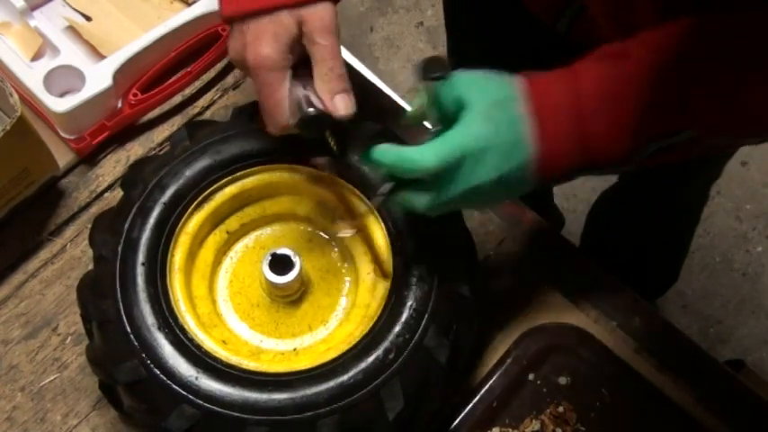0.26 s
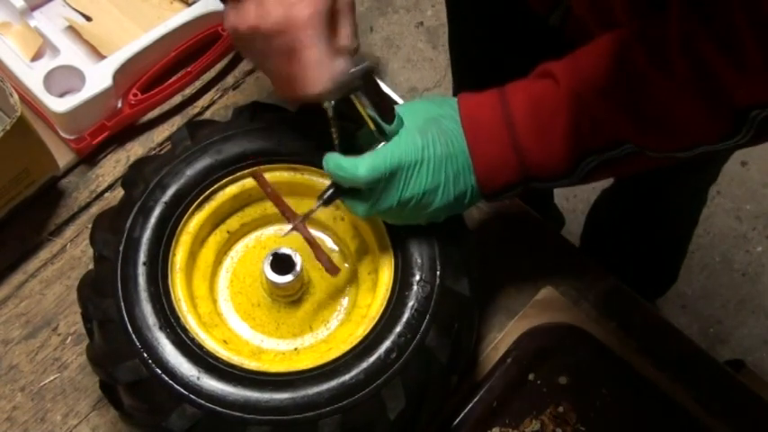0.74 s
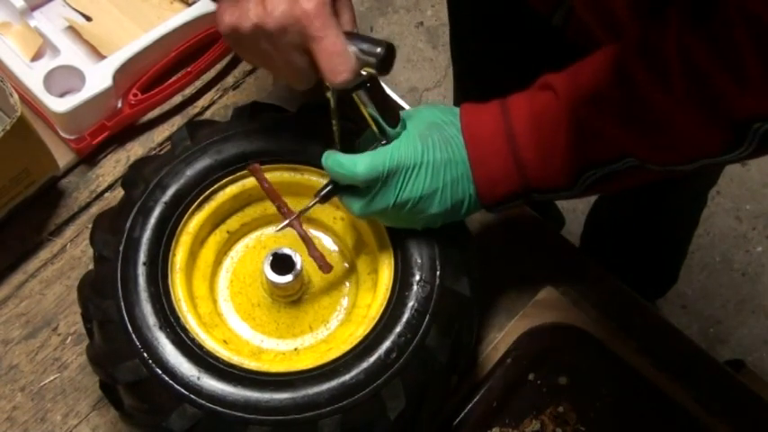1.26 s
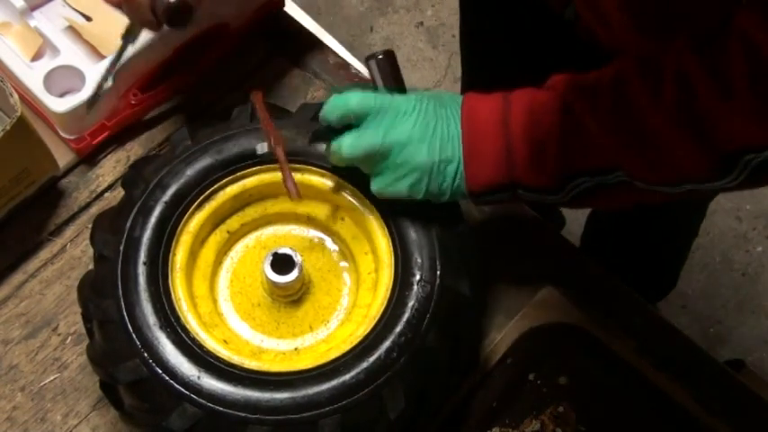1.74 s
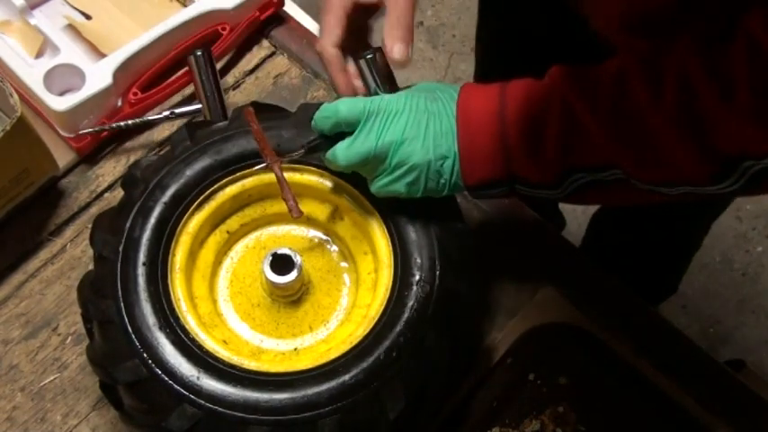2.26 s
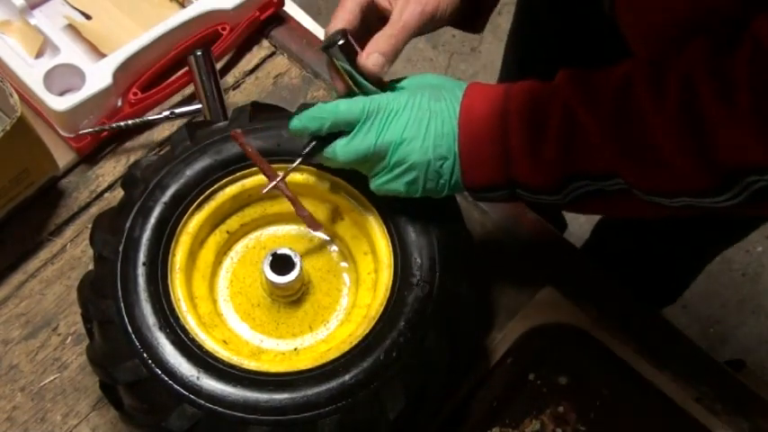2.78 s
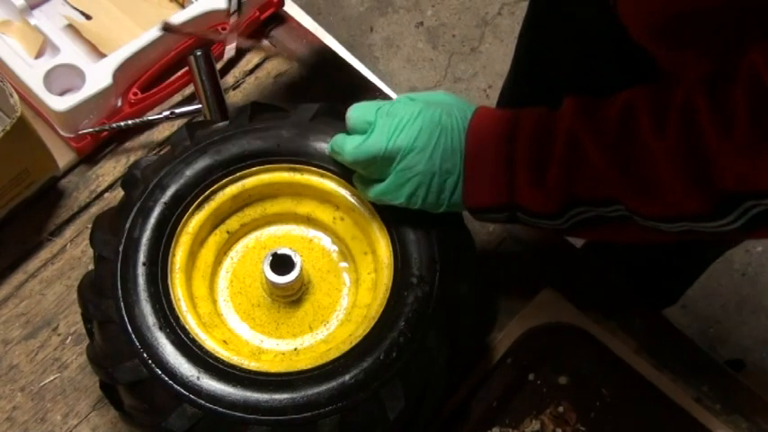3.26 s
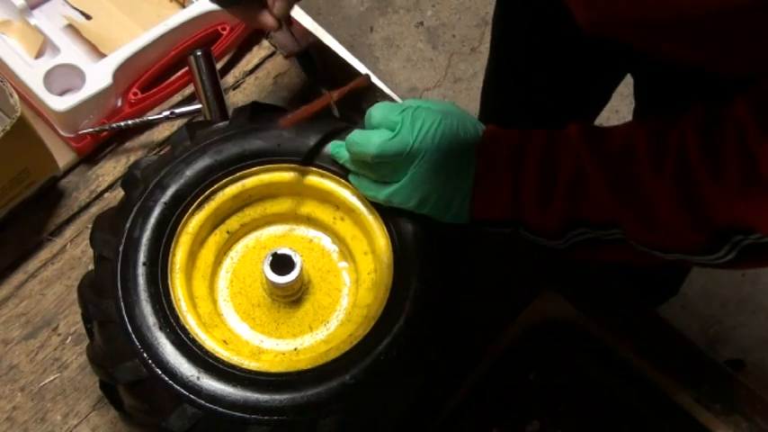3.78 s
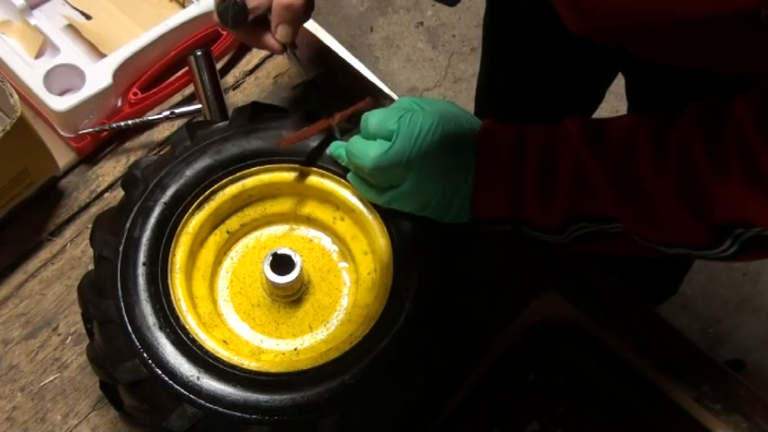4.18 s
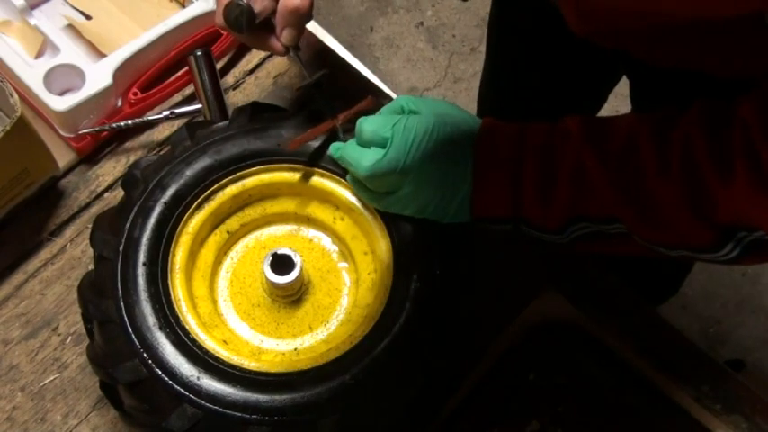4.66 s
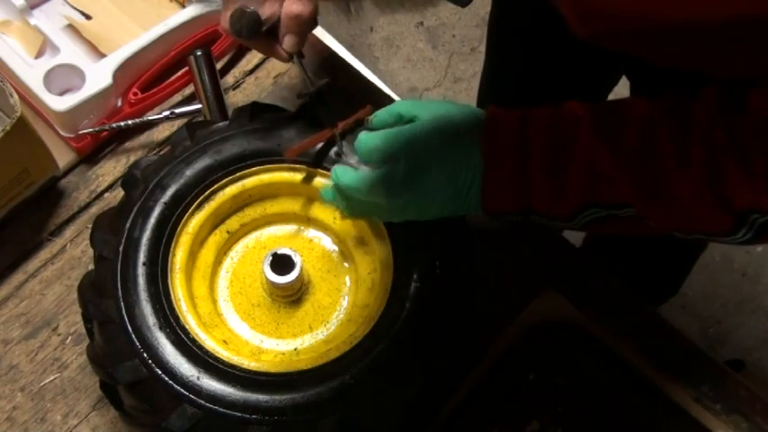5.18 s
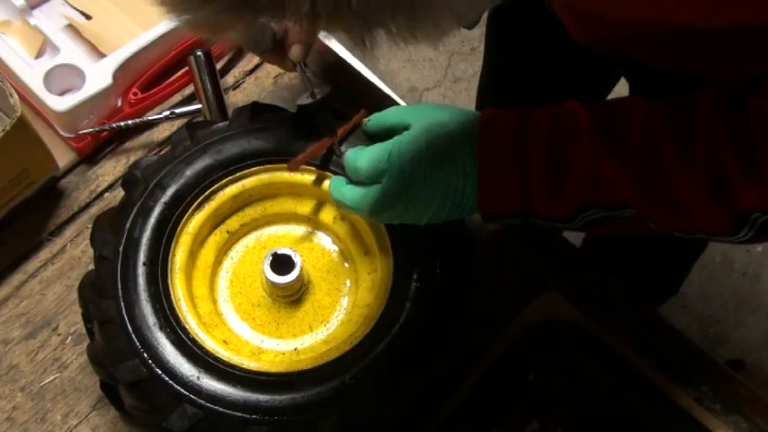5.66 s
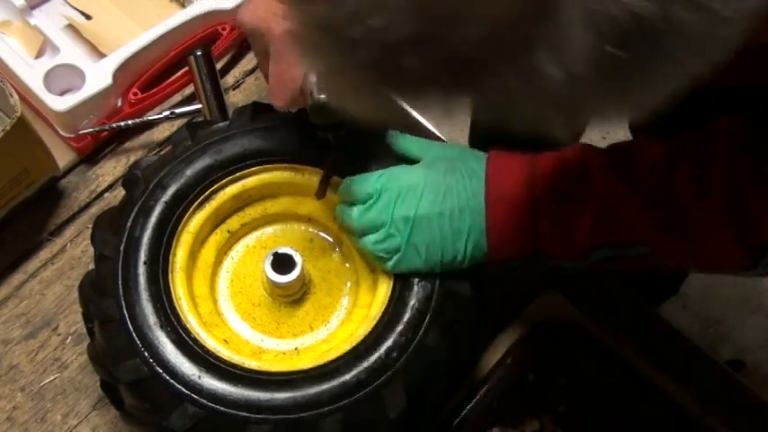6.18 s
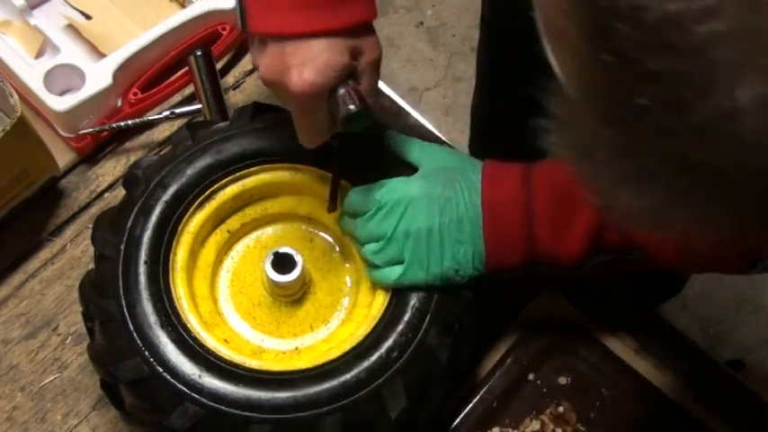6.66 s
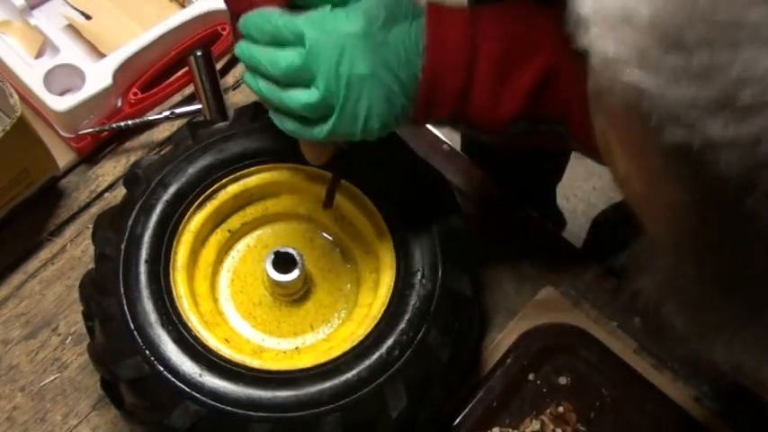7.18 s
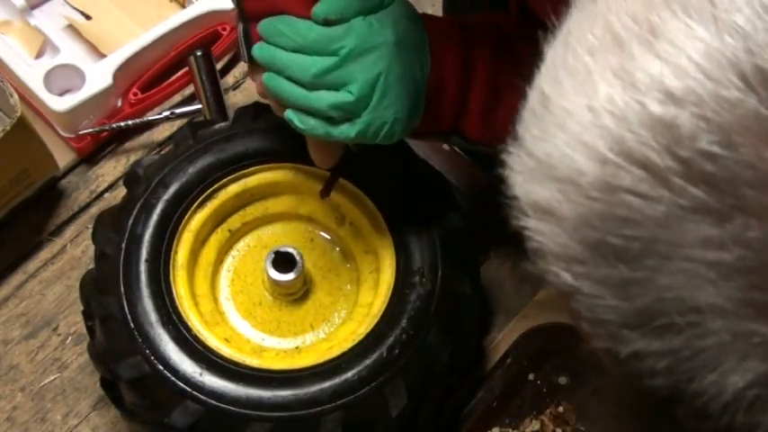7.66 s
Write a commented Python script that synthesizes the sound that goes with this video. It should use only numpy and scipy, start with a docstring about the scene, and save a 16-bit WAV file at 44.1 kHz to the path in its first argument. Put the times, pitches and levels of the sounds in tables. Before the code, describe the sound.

A quiet garage, heard from close beside a small punctured tyre. At about 0.3 seconds, tools knock dully on a bench to the left and rattle briefly. From 1.3 to 2 seconds, air hisses from the hole in uneven spurts. Just after 2 seconds a tool clatters into a plastic tray on the left, with sharp clicks. Faint puffs follow, then a stronger one with a tiny rubber squeak at 3 seconds. Small puffs, thin high whistles and ticks continue, with a sharp spit of air at 4.6 seconds. At 5.1 seconds, clicks open the longest leak, a bright, sputtering hiss that shifts in tone, with a faint rubber squeal near 5.6 seconds. It cuts off at 6.7 seconds. Light clicks, faint rings from the steel rim and soft sleeve rustle fade into the room's low hush by 7.6 seconds.

```python
"""Air escaping from a puncture in a small tubeless tyre, on a garage bench, close to a near-mono microphone.
A reamer, a finger and a plug tool open and close the hole: the turbulent jet hisses in puffs and longer
leaks, whistles through narrow gaps and flaps the rubber into a squeal. Tools click, chatter, ring the steel
rim and knock on the bench and a plastic tray to the left. Behind them, sleeves rustle in a quiet room."""
import sys
import numpy as np
from scipy import signal
from scipy.fft import rfft, irfft, next_fast_len
from scipy.io import wavfile
from scipy.ndimage import uniform_filter1d, map_coordinates

SR = 44100
rng = np.random.default_rng(int(sys.argv[2]) if len(sys.argv) > 2 else 0)


def to_wav(s):
    """Save 16-bit WAV."""
    ch = np.atleast_2d(s).T  # columns
    pcm = np.round(np.clip(ch, -1, 1) * 32767)  # PCM
    wavfile.write(sys.argv[1], SR, pcm.astype(np.int16))


N = 349272

# The jet's colour before its bands are balanced. Each row: frequency in Hz, relative level in dB.
JET_SPECTRUM = [(200, -37), (500, -19.5), (1000, -15.5), (2650, -12), (3900, -13.5), (5200, -6), (8400, 2),
                (12000, -6.5), (13500, -7.5), (15900, -17)]
# Noise close to the microphone. Each row: frequency in Hz, left-right likeness (1 is mono).
CLOSE_LIKENESS = [(9000, 0.94), (15000, 1)]
# Leaks and a puff whose loudness and colour change as they hiss; one list each. Each row: time in
# seconds, hiss in dB, then low rasp, hole resonance and treble in dB over the hiss.
SHAPED_LEAKS = [
    [(1.3, -37.5, -5, -19, -1), (1.32, -23.5, -10, -26, 5), (1.44, -24, -22, -36, 7),
     (1.51, -19, -13, -31, -4), (1.6, -23, -15.5, -32, 5), (1.68, -19, -15.5, -19.5, -9.5),
     (1.7, -42.5, -25, -5, -13.5), (1.79, -54, -23, -24, -5.5)],
    [(2.94, -49.5, 8, -24, 6.5), (2.957, -29, -10.5, -27, 5), (3.035, -18, -15, -15, -7),
     (3.075, -47.5, -12, -16, -10)],
    [(5.142, -33, -8, -11, -2.5), (5.158, -18.5, -9.5, -16, -11), (5.19, -22, -16, -28, -0.5),
     (5.25, -24.5, -19.5, -36, 7), (5.5, -25.5, -14, -18.5, 6.5), (5.74, -17.5, -20, -30, -6),
     (5.9, -19.5, -25.5, -33.5, -4), (6.1, -22, -24, -24, 2), (6.18, -30, -20.5, -21.5, 3),
     (6.31, -28, -21, -17, 1.5), (6.33, -25.5, -19.5, -7.5, -2), (6.42, -26.5, -18.5, -13, 3),
     (6.46, -32, -18, -15, 10), (6.55, -30.5, -18.5, -15.5, 4.5), (6.59, -25, -16.5, -10, 1.5),
     (6.665, -34, -17, -20, 2.5), (6.7, -78.5, -24, -13, -7.5)],
]
# Short leaks. Each row: fully open and starting to shut in seconds, hiss in dB, rise and fall
# in dB per second, then low rasp, hole resonance and treble in dB over the hiss.
SHORT_LEAKS = [(1.276, 1.316, -38.5, 2306, 799.5, -15, -17.5, 0.5),
               (1.82, 1.868, -22.5, 1909, 412.5, -10, -35, 2.5),
               (1.948, 1.983, -23.5, 242, 912.5, -10.5, -18, -1),
               (2.21, 2.225, -40, 120.5, 65.5, -14.5, -29, 0.5),
               (2.72, 2.788, -38, 147.5, 74, -15, -18, 1.5),
               (3.509, 3.559, -48.5, 281.5, 319, -17, -23, -1),
               (3.762, 3.836, -38, 1200, 707, -9, -22, 2.5), (4.62, 4.624, -20.5, 6000, 2500, -23, -28, -9),
               (4.63, 4.978, -46, 1002, 64, -30.5, -21.5, -6),
               (5.1, 5.153, -35.5, 401, 800, -14.5, -25, -3)]
def jet(band_edges_hz=(3500, 11500), hole_hz=3100, hole_width_hz=700):
    """Turbulent air; how the hole is covered shifts weight between three bands and its ringing hollow."""
    hiss, rasp, hole, treble = curves(SHAPED_LEAKS)
    powers = amp([hiss + rasp, hiss, hiss + treble, hiss + hole]) ** 2
    for *shape, rasp, hole, treble in SHORT_LEAKS:
        powers += (swell(*shape) * amp([[rasp], [0], [treble], [hole]])) ** 2

    def split(hz):
        below = np.array([1 / (1 + (hz / edge) ** 8) for edge in band_edges_hz])[:, None]
        bands = np.diff(below, axis=0, prepend=0, append=1)
        hollow = resonance(hz, hole_hz, hole_width_hz) ** 2 / amp(along(JET_SPECTRUM, hz))
        comb = 1 + .14 * np.exp(-2j * np.pi * hz / 1680)  # a second path off the wheel, 20 cm longer
        return np.concatenate([bands, hollow[None, None]]) * comb

    parts = filtered(rush(JET_SPECTRUM, CLOSE_LIKENESS, patchy_db=2.0), split)
    flutter = 0.22 * wobble(45)  # the flow sputters, most in the rasp and the hollow
    sputter_db = [flutter + 1.3 * wobble(30), flutter, flutter, flutter + 1.5 * wobble(25)]
    return sum(np.sqrt(power) * amp(db) * unit(part) for power, db, part in zip(powers, sputter_db, parts))


# At the hole. Each row: start and length in seconds, first and last pitch in Hz, level in dB.
GAP_WHISTLES = [(1.674, 0.0061, 2710, 3380, -14.5), (2.68, 0.025, 4750, 6160, -37.5),
                (3.5, 0.034, 15600, 15300, -35.5), (3.532, 0.038, 15900, 13300, -35),
                (3.76, 0.024, 15770, 12720, -20.5), (4.617, 0.025, 13900, 16070, -26),
                (4.7, 0.012, 15870, 14360, -24)]
def whistles():
    """Air through a narrow gap sings a breathy tone that glides as the gap changes."""
    out = np.zeros(N)
    for start, length, first_hz, last_hz, db in GAP_WHISTLES:
        n = round(length * SR)
        hz = np.linspace(first_hz, last_hz, n) * (1 + 0.022 * smooth_noise(SR // 10, 40)[:n])
        breath = 1 + .55 * unit(smooth_noise(SR // 10, 60))[:n]
        tone = np.sin(2 * np.pi * np.cumsum(hz) / SR)
        add(out, start, amp(db) * breath * np.sqrt(2 * np.hanning(n)) * tone)
    return out


# One list a squeal. Each row: time in seconds, pitch in Hz, relative level in dB.
RUBBER_SQUEALS = [
    [(3.004, 1326, -41), (3.013, 1036, -32.5), (3.023, 1085, -39.5), (3.035, 1532, -31), (3.044, 2210, -30)],
    [(5.55, 1025, -61), (5.575, 893, -34.5), (5.605, 887, -64)],
    [(5.61, 540, -47.5), (5.67, 606, -40), (5.73, 564, -49.5), (5.77, 530, -55.5), (5.86, 519, -53),
     (5.9, 685, -46), (5.925, 815, -49)],
]
def squeal(harmonics_db=(1, 4, -6), full_db=-40, ring_hz=3240):
    """Rubber lips flap in the flow: a shaky harmonic tone, purer when faint."""
    hz, db = curves(RUBBER_SQUEALS)
    phase = 2 * np.pi * np.cumsum(hz * (1 + 0.009 * wobble(250))) / SR
    thin_db = .35 * np.minimum(db - full_db, 0)
    shake_db = np.where(thin_db < 0, 1.5, 4.5)
    tone = sum(amp(db + level + k * thin_db + shake_db * wobble(150)) * np.sin((k + 1) * phase)
               for k, level in enumerate(harmonics_db))
    rubber = lambda ratio: 1 / (1 - ratio ** 2 + .2j * ratio) / (1 + ratio ** 8)
    return filtered(tone, lambda f: rubber(f / ring_hz))  # the rubber rings and passes little above


# Sharp clicks of tools and rubber, and pops of air as the hole opens, close to the microphone.
# Each row: start in seconds, relative level in dB, centre in Hz.
SHARP_CLICKS = [(0.1005, -28.5, 8990), (0.263, -7, 11530), (0.4045, -16.5, 5740), (0.435, -22.5, 8140),
                (0.7437, -29.5, 7300), (1.273, -31, 11100), (2.0282, -0.5, 7280), (2.0428, -1.5, 5170),
                (2.1313, -6, 7710), (2.213, -12, 9030), (2.2417, -19.5, 8100), (2.522, -25.5, 8960),
                (2.664, -19.5, 7230), (3.4176, -31, 7660), (3.61, -24.5, 7850), (3.6458, -17.5, 5710),
                (3.926, -33, 2630), (4.0066, -40.5, 2830), (4.2403, -38, 8500), (4.474, -22.5, 12800),
                (4.483, -25.5, 10460), (4.563, -25, 8940), (4.607, -11, 7350), (4.6151, -10, 7110),
                (5.0752, -20, 7020), (5.1356, -7.5, 8000), (5.146, -19.5, 1330), (5.1522, -1.5, 6330),
                (5.181, -10.5, 1484), (6.748, -8, 10780), (6.845, -33, 9220), (6.963, -30.5, 4910),
                (7.1034, -24.5, 12200), (7.1448, -22, 7640), (7.175, -27.5, 8280)]
def clicks(low_cut_hz=1500):
    """Each is a wide crack around one pitch, plus a few damped cycles there."""
    out, t = np.zeros(N), np.arange(SR // 40) / SR
    for start, db, hz in SHARP_CLICKS:
        crack = 0.56 * amp(-60 * t / 0.015) * smooth_noise(len(t), 4) * np.cos(2 * np.pi * hz * t)
        ring = .6 * np.exp(-t * hz / 5) * np.sin(2 * np.pi * hz * t)
        add(out, start, amp(db) * (crack + ring))
    return filtered(out, lambda hz: 1j * hz / (low_cut_hz + 1j * hz))


# Blows on bench and tray, left of the microphone. Each row: start in seconds, relative level in dB.
BENCH_KNOCKS = [(.239, -3), (.253, -1.5), (.269, -4), (.317, -20), (.41, -17), (.645, -34), (1.335, -25)]
TRAY_KNOCKS = [(2.031, -3), (2.045, 2.5), (2.061, -11), (2.074, -5.5), (2.114, -2), (2.139, -7),
               (2.174, -30.5)]
# Their resonances. Each row: centre and width in Hz, relative level in dB.
BENCH_MODES = [(90.6, 42, -0.5), (168, 70, 0.5), (302.6, 57, -4.5), (374, 100, -12.5), (1040, 7100, -38.5)]
TRAY_MODES = [(183, 29, -6.5), (313, 28, -2.5), (534, 110, -11.5), (767, 200, -11.5), (1220, 750, -16),
              (3910, 13000, -31.5)]
def knocks(blows, modes, judder, t60, soft_hz):
    """Each dull blow is a soft push and a dying judder, heard through the body's broad resonances."""
    force, t = np.zeros(N), np.arange(SR // 4) / SR
    for start, db in blows:
        push = judder * amp(-60 * t / t60) * rng.standard_normal(len(t))
        push[0] = 1
        add(force, start, amp(db) * push)
    body = lambda hz: sum((-1) ** k * amp(db) * resonance(hz, centre, width)
                          for k, (centre, width, db) in enumerate(modes))
    return filtered(force, lambda hz: body(hz) / (1 + 1j * hz / soft_hz))


# A loose tool in the tray, and taps on the steel rim. Each row: start in seconds, relative level in dB.
TOOL_CHATTER = [(0.2558, -14.5), (0.2943, -11), (0.3805, -23), (0.416, -21.5), (0.4486, -32), (0.4796, -29),
                (0.508, -28), (0.7053, -39), (0.7367, -35)]
RIM_STRIKES = [(0.329, -30), (.63, -44), (6.564, -36.5), (6.626, -39.5), (7.234, -33), (7.317, -42),
               (7.547, -44.5)]
# Their modes. Each row: frequency in Hz, relative level in dB, seconds to fall 60 dB.
TOOL_MODES = [(1870, -11, 0.025), (2500, -2.5, 0.0072), (3560, 6.5, 0.0028)]
RIM_MODES = [(480, -11.5, 0.36), (493, -15, 0.53), (775, -15.5, 0.35), (1155, -12.5, 0.087)]
def ringing_taps(taps, modes, scatter_db, attack_s):
    """Every tap rings the tool's or rim's damped modes at new strengths."""
    out, t = np.zeros(N), np.arange(SR // 2) / SR
    hz, level, t60 = np.transpose(modes)[..., None]
    for start, db in taps:
        level_db = level + scatter_db * rng.standard_normal(hz.shape)
        ring = amp(level_db - 60 * t / t60) * np.sin(2 * np.pi * hz * t)
        add(out, start, amp(db) * ring.sum(0) * (1 - np.exp(-t / attack_s)))
    return out


# Cloth near the microphone. Each row: loudest moment in seconds, level in dB.
CLOTH_STROKES = [(.3, -49.5), (.6, -52), (.86, -60), (1.24, -58), (3.18, -52), (6.76, -56.5), (6.89, -52),
                 (7.13, -45.5), (7.26, -58.5)]
# Its colour. Each row: frequency in Hz, relative level in dB.
CLOTH_SPECTRUM = [(300, -2.5), (600, -4), (2000, -9), (8000, -2.5), (15900, -19)]
def rustle():
    """Sleeves and glove brush in small uneven grains; every stroke swells and fades alike."""
    grains = amp(3.1 * wobble(300))
    strokes = sum(swell(at, at, db, rise=122, fall=63.5) for at, db in CLOTH_STROKES)
    return strokes * unit(grains * rush(CLOTH_SPECTRUM, CLOSE_LIKENESS, patchy_db=2.5))


# The room around the bench. Each row: frequency in Hz, seconds to fall 60 dB.
GARAGE_DECAY = [(150, 0.45), (3000, 0.29), (14000, 0.17)]
def garage(sound):
    """The room answers a moment later, its treble dying first."""
    hz, t, noise = signal.stft(rng.standard_normal((2, SR // 2)), SR, nperseg=256)
    decay = amp(-60 * t / along(GARAGE_DECAY, hz)[:, None])
    tail = signal.istft(noise * decay, SR, nperseg=256)[1]
    tail += 1.4 * tail.mean(0)  # the microphone's two ports lie close together
    delayed = np.pad(sound, (200, 0))[None]
    return signal.fftconvolve(delayed, tail / np.linalg.norm(tail[0]), axes=1)[:, :N]


# The garage's background. Each row: frequency in Hz, relative level in dB.
ROOM_SPECTRUM = [(15, -38.5), (47, -9.5), (250, -19), (700, -26), (3600, -33), (15900, -36)]
def room_tone(level_db=-55.5):
    """A low, barely wavering hush all around the microphone."""
    return amp(level_db + 0.27 * wobble(3)) * rush(ROOM_SPECTRUM, likeness=[(1000, 0.46)], patchy_db=0.5)


def amp(db):
    return 10 ** (np.asarray(db) / 20)


def unit(x):
    return x / np.sqrt(np.mean(x ** 2) + 1e-20)


def add(track, start, sound):
    part = track[round(start * SR):][:len(sound)]
    part += sound[:len(part)]


def along(points, hz):
    """Reads (Hz, value) points on a log axis."""
    freqs, values = np.transpose(points)
    return np.interp(np.log(hz + 1), np.log(freqs + 1), values)


def curves(events):
    """Each column's value at every sample; -120 between events."""
    t, out = np.arange(N) / SR, np.full((len(events[0][0]) - 1, N), -120.)
    for rows in events:
        times, *columns = np.transpose(rows)
        inside = (t >= times[0]) & (t <= times[-1])
        out[:, inside] = [np.interp(t[inside], times, column) for column in columns]
    return out


def swell(start, end, db, rise, fall):
    """Gain that climbs to db at start, holds to end and sinks, at rates in dB per second."""
    t = np.arange(N) / SR
    return amp(db - rise * np.clip(start - t, 0, None) - fall * np.clip(t - end, 0, None))


def wobble(rate):
    """A smooth random curve, rate knots a second."""
    return map_coordinates(rng.standard_normal(int(N * rate / SR) + 4), [np.arange(N) * rate / SR])


def smooth_noise(n, span):
    return uniform_filter1d(rng.standard_normal(n), size=span)


def resonance(hz, centre, width):
    return 1j * hz * width / (centre ** 2 - hz ** 2 + 1j * hz * width)


def filtered(x, response):
    """x through a response given as a function of Hz."""
    size = next_fast_len(N + 8192)
    return irfft(rfft(x, size) * response(np.fft.rfftfreq(size, 1 / SR)), size)[..., :N]


def rush(spectrum, likeness, patchy_db):
    """Stereo noise of rms 1 with patches of random gain."""
    cells = signal.stft(rng.standard_normal((2, N)), nperseg=256)[2]
    patches = uniform_filter1d(rng.standard_normal(cells.shape[1:]), size=4, axis=0)
    patches = unit(uniform_filter1d(patches, size=16, axis=1))
    pair = signal.istft(cells * amp(patchy_db * patches), nperseg=256)[1][:, :N]
    turn = lambda hz: np.arccos(np.clip(along(likeness, hz), -1, 1)) / 2
    mid, side = filtered(pair, lambda hz: amp(along(spectrum, hz)) * [np.cos(turn(hz)), np.sin(turn(hz))])
    return unit(np.array([mid + side, mid - side]))


def scene():
    """The tyre close and nearly centred, bench and tray to the left, the garage around them."""
    bench = amp(33) * knocks(BENCH_KNOCKS, BENCH_MODES, judder=0.042, t60=0.31, soft_hz=2560)
    tray = amp(32) * knocks(TRAY_KNOCKS, TRAY_MODES, judder=0.076, t60=0.24, soft_hz=6210)
    chatter = ringing_taps(TOOL_CHATTER, TOOL_MODES, scatter_db=1.5, attack_s=0.00061)
    rim = ringing_taps(RIM_STRIKES, RIM_MODES, scatter_db=3.5, attack_s=0.0041)
    near = clicks() + whistles() + chatter + rim
    air = jet() + squeal()
    room = amp(-14.5) * garage(air.mean(0)) + amp(-8.5) * garage(near) + amp(-16.5) * garage(bench + tray)
    centre = (near + air) * amp([[.2], [-.2]])
    left = bench * amp([[1.6], [-1.6]]) + tray * amp([[1.3], [-1.3]])
    return centre + left + room + room_tone() + rustle()


def record(dry):
    """The camera beside the tyre keeps nothing above its band limit."""
    return filtered(dry, lambda hz: hz < 15850)


dry = scene()
out = record(dry)
to_wav(out)
```